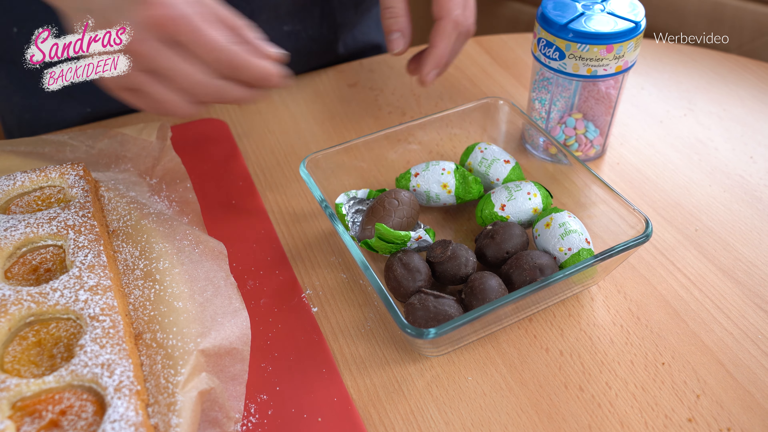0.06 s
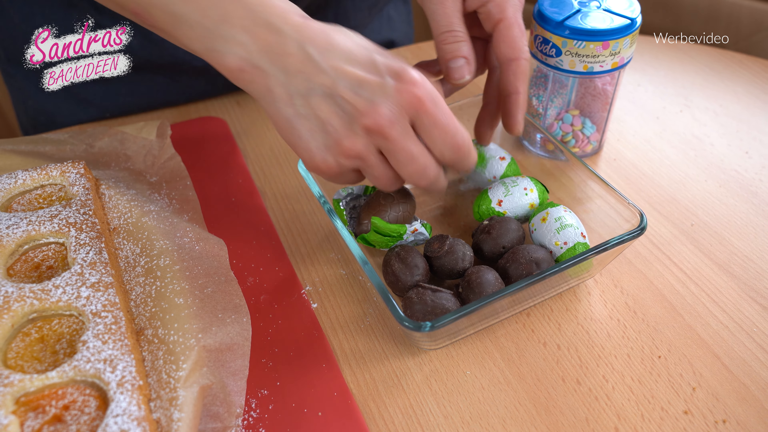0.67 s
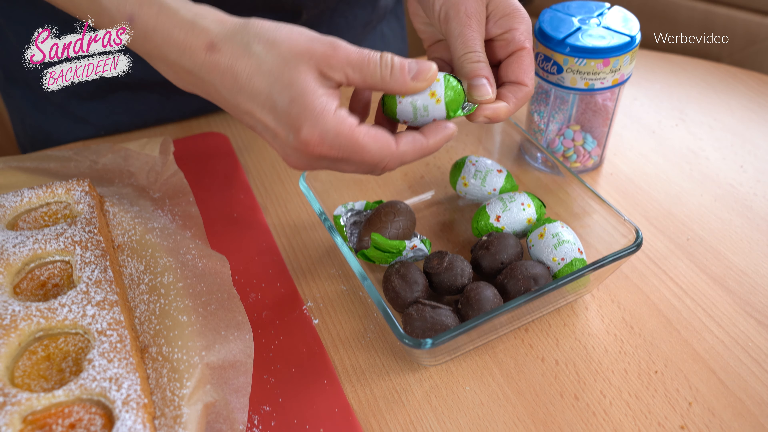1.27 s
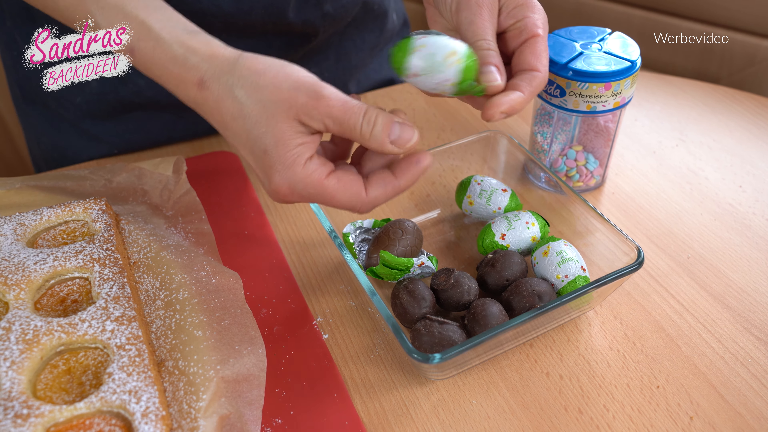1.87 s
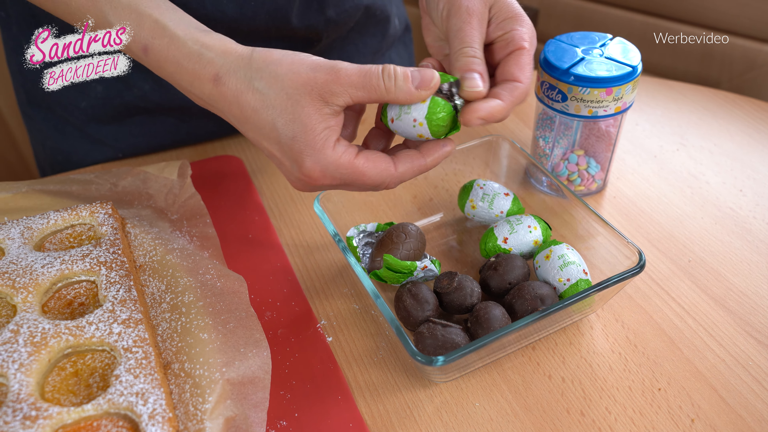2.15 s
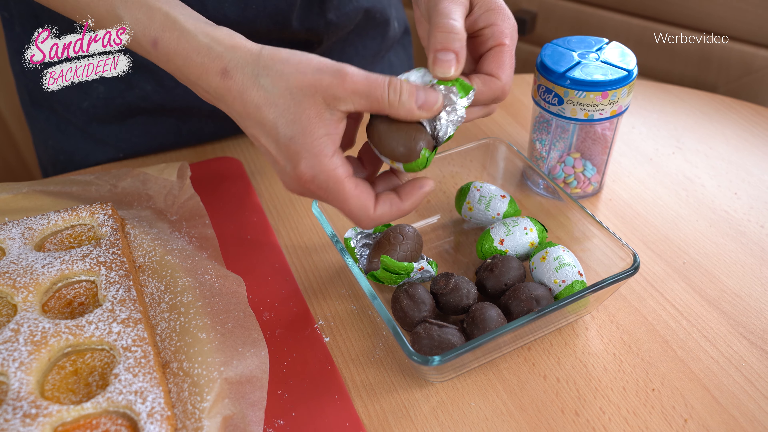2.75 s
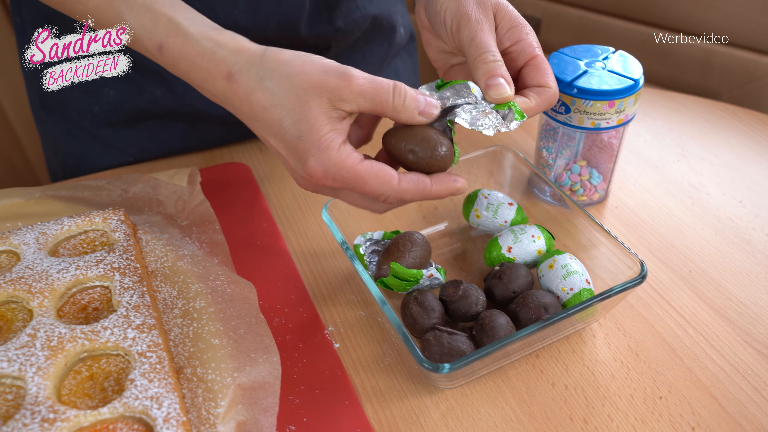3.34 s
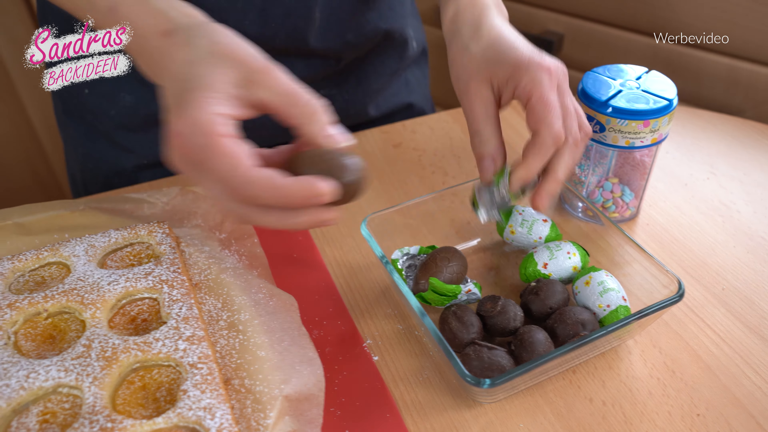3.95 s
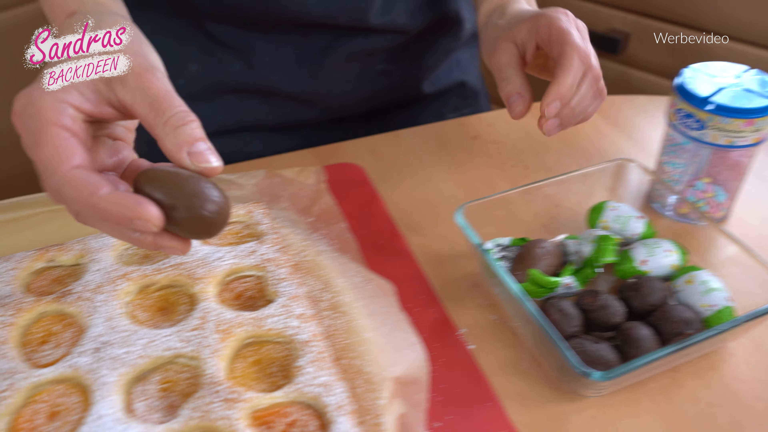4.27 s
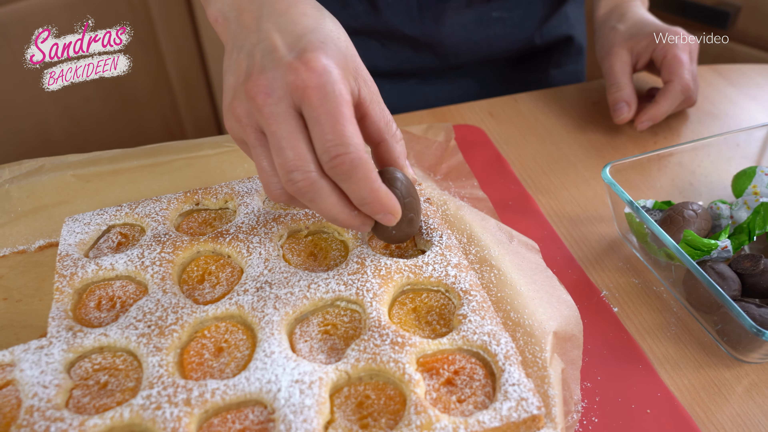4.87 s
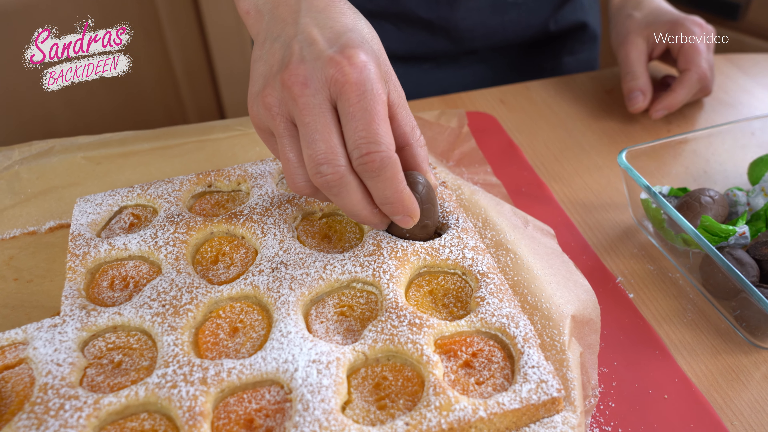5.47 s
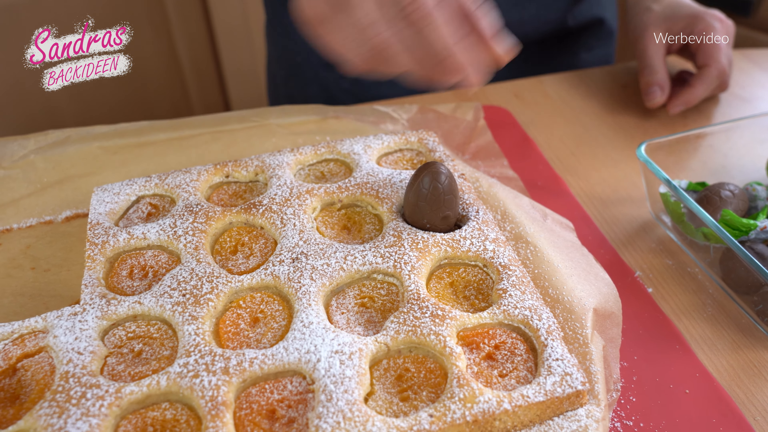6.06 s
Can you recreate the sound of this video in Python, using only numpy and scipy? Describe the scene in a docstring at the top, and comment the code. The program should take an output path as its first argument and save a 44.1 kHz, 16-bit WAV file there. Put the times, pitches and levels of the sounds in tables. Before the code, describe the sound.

Chocolate eggs knock in a glass dish, then thin foil crinkles and snaps as it is peeled off, followed by a soft click.

```python
"""A foil-wrapped chocolate egg is picked out of a glass dish in a small kitchen; the eggs knock about.
The foil is peeled: creases snap, facets pop, tiny buckles crinkle. It is balled up and dropped in the
dish, where it ticks as the creases relax. The bare egg is pressed into a sponge cake with one soft click.
Soft rubbing comes and goes over a low rumble and hiss."""
import sys
import numpy as np
from scipy import signal
from scipy.fft import rfft, irfft
from scipy.io import wavfile
from scipy.ndimage import uniform_filter1d

SR = 44100
rng = np.random.default_rng(int(sys.argv[2]) if len(sys.argv) > 2 else 0)


def persist_wave(psi):
    """Save psi, clipped to +-1, as 16-bit WAV."""
    counts = np.round(np.clip(psi, -1, 1) * 32767).astype(np.int16)
    wavfile.write(sys.argv[1], SR, np.atleast_2d(counts).T)


N = 273861
TIME = np.arange(N) / SR

# Loudest creases, largest facets. Each row: start in seconds, relative level in dB, pitch in Hz.
CREASE_SNAPS = [(0.6322, -32, 6600), (0.655, -37, 5500), (0.8623, -32, 3340), (0.8827, -33, 9100),
                (1.1113, -28.5, 10400), (1.1415, -34.5, 5440), (1.2032, -30, 9860), (1.2517, -36, 3900),
                (1.3688, -37, 9400), (1.4273, -26.5, 9100), (1.5504, -34.5, 5870), (1.612, -36, 7650),
                (1.6592, -31, 8900), (1.6679, -25.5, 9100), (1.7335, -25.5, 5740), (1.7666, -29, 12200),
                (1.7892, -23.5, 4300), (1.8322, -32, 9300), (1.9427, -34.5, 9100), (2.0093, -32, 5200),
                (2.1439, -27.5, 5430), (2.1989, -22.5, 5100), (2.2311, -19.5, 7700), (2.4022, -28, 9600),
                (2.4087, -27.5, 6640), (2.4976, -26.5, 8700), (2.5222, -27, 8600), (2.6248, -31, 4220),
                (2.8423, -27.5, 3420), (2.9411, -29, 9900), (3.0169, -32, 8000), (3.0757, -29.5, 10000),
                (3.133, -29.5, 8200), (3.2345, -27.5, 2790), (3.3281, -30.5, 8900), (3.41, -32, 5800),
                (3.4875, -26.5, 7600), (3.7066, -39, 5100), (3.7272, -18, 7500), (3.7944, -30.5, 4600),
                (3.8331, -26.5, 5830), (3.9071, -32, 4340), (4.0332, -30.5, 5000), (4.1037, -27.5, 6370),
                (4.2096, -24, 7700), (4.2785, -23.5, 5800)]
FACET_POPS = [(1.7173, -29, 1250), (2.0838, -27, 830), (2.1437, -27, 1130), (2.201, -26, 1290),
              (2.2854, -24.5, 990), (2.3834, -27, 716), (2.3985, -20.5, 1250), (2.526, -21, 1550),
              (2.8037, -28.5, 1180), (2.93, -25, 1050), (3.0426, -24, 830), (3.0585, -22, 820),
              (3.2343, -26.5, 1090), (3.2796, -30.5, 940), (3.5332, -27, 1070), (3.9072, -29.5, 1170),
              (3.937, -30.5, 1310), (4.0368, -29, 1350), (4.191, -30.5, 1540), (4.2784, -26, 1460)]
# Foil spectra. Each row: frequency in Hz, relative level in dB.
CRINKLE_SPECTRUM = [(1200, -1), (2200, -10), (3200, -4.5), (5000, 2.5), (6600, -4), (8300, 5.5),
                    (11000, -13.5), (13500, -2.5), (16000, -31)]
RUSTLE_SPECTRUM = [(350, -14.5), (520, 0), (700, -2), (950, 0), (1400, 0.5), (2000, -3.5), (3000, -8)]
# Fingers stirring the foil. Each row: time in seconds, relative level in dB.
STIRRING = [(0.47, -60), (0.65, -50), (1.25, -53.5), (1.66, -55.5), (1.85, -47), (2.35, -46.5),
            (2.78, -51.5), (2.95, -43.5), (3.15, -41.5), (3.35, -47), (3.6, -39.5), (3.9, -46.5),
            (4.3, -55), (4.45, -66)]
# Tugs. Each row: start in seconds, hold in seconds, crinkle and rustle in relative dB.
FOIL_TUGS = [(0.52, 0.034, -60, -44), (0.658, 0.034, -41, -42), (0.855, 0.037, -41, -44.5),
             (0.983, 0.016, -44, -55), (1.09, 0.036, -45, -72), (1.297, 0.17, -45.5, -54.5),
             (1.524, 0.071, -47, -47), (1.71, 0.011, -28.5, -50), (1.763, 0.087, -44, -47.5),
             (2.078, 0.015, -42.5, -46.5), (2.137, 0.0078, -39, -57), (2.198, .05, -37, -58),
             (2.396, .014, -28.5, -37.5), (2.506, 0.13, -33, -43.5), (2.803, 0.045, -30.5, -36),
             (2.976, 0.099, -44, -40.5), (3.234, 0.046, -34.5, -43.5), (3.372, 0.068, -37.5, -42.5),
             (3.472, 0.085, -37, -42), (3.696, 0.053, -29, -34), (3.773, 0.036, -36, -40.5),
             (4.01, 0.038, -39.5, -41.5), (4.092, 0.013, -37, -39.5), (4.19, 0.027, -39.5, -37.5),
             (4.266, 0.04, -32.5, -39)]
# Balling up. Each row: time in seconds, crumpled share from 0 to 1.
CRUMPLED_SHARE = [(3.82, 0.03), (3.92, 0.67)]
# Dropped foil. Each row: start in seconds, relative level in dB.
SETTLING_TICKS = [(4.4867, -39.5), (4.6525, -41), (4.769, -45.5), (4.857, -46), (4.926, -51), (4.982, -52)]
# Foil ball; dish on a wooden table. Each row: frequency in Hz, gain in dB, T60 in seconds.
WRAPPER_MODES = [(1550, -12, 0.027), (1965, -6, 0.012), (3670, -10.5, .02), (4600, -4, 0.0046),
                 (5200, -0.5, 0.0067), (7700, -1, .002)]
DISH_MODES = [(93, -5.5, 0.28), (124.6, -4.5, 0.25), (298.2, -7.5, 0.28), (342, -1, 0.24),
              (409.3, -5, 0.29), (459.5, -7, .16), (521.5, 1, 0.34), (576, -2, .12), (726, 1.5, 0.14),
              (793, -7, 0.25), (850, -4.5, 0.16), (951, -6, 0.066), (990, 0, 0.046), (1130, 4.5, 0.065),
              (1157, -9, 0.22), (1427, -17, 0.5), (2200, -5.5, 0.19)]
# Eggs hitting the dish. Each row: start in seconds, relative level in dB, contact cut-off in Hz,
# most strongly struck frequency in Hz.
EGG_KNOCKS = [(0.351, -27, 500, 340), (0.378, -28, 700, 600), (.382, -2, 1020, 950),
              (0.3911, -6.5, 700, 473), (.396, -6.5, 500, 342), (.432, -9, 653, 514), (.513, -15, 800, 430),
              (0.53, -18, 550, 342), (.545, -11.5, 447, 342), (.682, -2, 1250, 726), (0.686, -3, 493, 364),
              (.943, -7, 1180, 760), (1.001, -21.5, 1300, 1130)]
# Hands, foil and cake. Each row: centre in seconds, length in seconds, level in dB, pitch in Hz.
SOFT_RUBS = [(0.143, 0.46, -58.5, 790), (0.266, 0.035, -55, 2200), (0.547, 0.043, -46, 2300),
             (0.63, .05, -49.5, 1920), (0.691, 0.04, -39.5, 2510), (1.36, 0.11, -50, 2700),
             (1.516, 0.06, -57, 173), (3.528, 0.035, -51.5, 118), (3.963, 0.47, -54, 116),
             (4.423, 0.4, -54.5, 362), (4.787, 0.076, -57.5, 800), (5.35, 0.074, -67, 1600),
             (5.781, 0.058, -61, 800), (5.777, 0.051, -60, 2680), (6.138, .12, -67, 880)]
# Egg seating in the cake: start in seconds, level in dB, pulse time scale in seconds.
CAKE_CLICK = (5.021, -30.5, 0.00137)
# Kitchen tail. Each row: frequency in Hz, T60 in seconds.
ROOM_DECAY = [(100, 0.52), (700, 0.42), (3000, 0.37), (8000, 0.45), (15000, 0)]
# Spectra of the tail and the quiet kitchen. Each row: frequency in Hz, relative level in dB.
TAIL_SPECTRUM = [(100, 7), (700, 4), (4500, 1.5), (9000, -1.5), (16000, -2.5)]
FLOOR_SPECTRUM = [(15, -21), (28, -3.5), (42, -1), (60, -7), (96, -9.5), (180, -14.5), (400, -18.5),
                  (700, -23), (1500, -25.5), (3400, -27.5), (15500, -31)]


def from_db(db):
    return 10 ** (np.asarray(db) / 20)


def unit_rms(x):
    return x / np.sqrt(np.mean(x ** 2) + 1e-20)


def at_hz(points, hz):
    table_hz, value = np.transpose(points)
    return np.interp(np.log(hz + 1e-9), np.log(table_hz), value)


def add(track, start_s, sound):
    at = round(start_s * SR)
    track[at:at + len(sound)] += sound[:N - at]


def band(x, low_hz, high_hz):
    sos = signal.butter(2, [low_hz, min(high_hz, .47 * SR)], "band", fs=SR, output="sos")
    return signal.sosfilt(sos, x)


def highpass(x, hz, order):
    return signal.sosfilt(signal.butter(order, hz, "high", fs=SR, output="sos"), x)


def ring(clicks, hz, t60_s):
    r, w = np.exp(-np.log(1000) / (t60_s * SR)), 2 * np.pi * hz / SR
    return signal.lfilter([0, np.sin(w)], [1, -2 * r * np.cos(w), r * r], clicks + 1e-18)


def drift(knots_per_s):
    knots = rng.standard_normal(int(TIME[-1] * knots_per_s) + 2)
    return 1.2 * np.interp(TIME * knots_per_s, np.arange(len(knots)), knots)


def buckles(rows, crack_db, low_hz):
    """A crease buckles in a burst of slips; the facet beside it swings while its tension shifts."""
    out, t = np.zeros(N), TIME[:SR // 80]
    for start_s, db, hz, length_s in rows:
        age = t / length_s
        glide = 1 + 0.11 * rng.standard_normal() * np.tanh(age)
        swing = np.sin(2 * np.pi * hz * t * glide) * age * np.exp(-3 * age)
        slips = rng.standard_normal(len(t)) * np.exp(-age)
        crack = unit_rms(band(slips, low_hz, 2.2 * hz))
        add(out, start_s, from_db(db) * unit_rms(unit_rms(swing) + from_db(crack_db) * crack))
    return out


def lesser_snaps(pull, first_s=1.5, last_s=4.1, median_gap_s=0.1):
    """Small creases give way at random, harder under a stronger pull. Rows as in CREASE_SNAPS."""
    gap, size, pitch = rng.standard_normal((80, 3)).T
    start_s = first_s + median_gap_s * np.cumsum(np.exp(.6 * gap))
    pull_db = 20 * np.log10(np.interp(start_s, TIME, pull) / pull.mean() + 1e-9)
    db = -35 + .3 * pull_db + 2.5 * size
    hz = 7360 * np.exp(0.52 * np.tanh(pitch))
    return np.column_stack([start_s, db, hz])[start_s < last_s]


def crackle(spectrum, per_s, size_db, clump_db, t60_cycles, wander_db):
    """Tiny buckles in clumps, each ringing briefly at one of 18 pitches; the sum is levelled."""
    born = np.flatnonzero(rng.random(N) < per_s * from_db(clump_db * drift(110)) / SR)
    sizes = from_db(size_db * np.minimum(rng.exponential(1, N), 3.5)) * rng.choice([-1, 1], N)
    pitches_hz = np.geomspace(spectrum[0][0], spectrum[-1][0], 18)
    pitch_index = rng.integers(0, len(pitches_hz), N)[born]
    out = 0
    for k, hz in enumerate(pitches_hz):
        clicks, at = np.zeros(N), born[pitch_index == k]
        clicks[at] = sizes[at]
        gain = from_db(at_hz(spectrum, hz) + wander_db * drift(14)) * np.sqrt(hz)
        out += gain * unit_rms(np.diff(ring(clicks, hz, t60_cycles / hz), prepend=0))
    return out / np.sqrt(uniform_filter1d(out ** 2, size=1500) + 1e-9)


def finger_effort(attack_s=0.0076, release_s=0.024):
    """Crinkle and rustle envelopes: tugs rise, hold and fade on top of the stirring."""
    crinkle = from_db(np.interp(TIME, *np.transpose(STIRRING), left=-np.inf, right=-np.inf))
    rustle = from_db(-3.5) * crinkle
    for start_s, hold_s, crinkle_db, rustle_db in FOIL_TUGS:
        age_s = TIME - start_s
        tug = np.clip(age_s / attack_s, 0, 1) * np.exp(-np.maximum(age_s - hold_s, 0) / release_s)
        crinkle = np.hypot(crinkle, from_db(crinkle_db) * tug)
        rustle = np.hypot(rustle, from_db(rustle_db) * tug)
    return crinkle, rustle


def peeling(snap_s=0.0011, pop_cycles=1.95):
    """Creases snap and crinkle, facets pop as they flip, the whole sheet rustles."""
    crinkle_gain, rustle_gain = finger_effort()
    snap_rows = [(s, db, hz, snap_s) for s, db, hz in [*CREASE_SNAPS, *lesser_snaps(crinkle_gain)]]
    pop_rows = [(s, db, hz, pop_cycles / hz) for s, db, hz in FACET_POPS]
    snaps = from_db(-9) * buckles(snap_rows, crack_db=0, low_hz=2130)
    pops = from_db(-11.5) * buckles(pop_rows, crack_db=-3.5, low_hz=550)
    crinkle = crackle(CRINKLE_SPECTRUM, 4400, size_db=3.5, clump_db=4.4, t60_cycles=12.5, wander_db=0)
    rustle = crackle(RUSTLE_SPECTRUM, 1600, size_db=4.5, clump_db=4.5, t60_cycles=8.3, wander_db=2)
    return snaps + pops + from_db(-3) * crinkle_gain * crinkle + from_db(-1.5) * rustle_gain * rustle


def balled_up(foil, hollow_hz=1390, hollow_db=3.5):
    """A thin sheet radiates no bass; crumpled, it loses more and its hollow resonates."""
    sheet = highpass(foil, 330, order=3)
    hollow = from_db(hollow_db) * signal.lfilter(*signal.iirpeak(hollow_hz, 3, fs=SR), sheet)
    ball = highpass(sheet + hollow, 1200, order=4) + 0.082 * sheet
    share = np.interp(TIME, *np.transpose(CRUMPLED_SHARE))
    return (1 - share) * sheet + share * ball


def settling(decay_s=0.0021):
    """Single creases relax with a dry tick and set the wrapper ringing."""
    slips, t = np.zeros(N), TIME[:SR // 100]
    for start_s, db in SETTLING_TICKS:
        burst = rng.standard_normal(len(t)) * np.exp(-t / decay_s)
        add(slips, start_s, from_db(db) * burst / np.linalg.norm(burst))
    ringing = sum(from_db(db) * ring(slips, hz, t60_s) for hz, db, t60_s in WRAPPER_MODES)
    return from_db(1.5) * ringing + from_db(19.5) * band(slips, 1400, 7600)


def dish_knocks(gain_db=-24.5, swing_hz=800, swing_s=0.00097, thud_s=0.028):
    """Each blow swings the dish once, favours the modes of the spot it hits and thuds in the table."""
    out, t = np.zeros(N), TIME[:SR // 3]
    hz, mode_db, t60_s = np.transpose(DISH_MODES)[:, :, None]
    swing = -from_db(21) * np.sin(2 * np.pi * swing_hz * t) * np.exp(-t / swing_s)
    for start_s, db, contact_hz, struck_hz in EGG_KNOCKS:
        favour_db = 6 * np.exp(-(np.log(hz / struck_hz) / 0.15) ** 2)
        strength = from_db(mode_db + favour_db + rng.standard_normal(hz.shape))
        age_s = np.maximum(t - .001 - 0.00395 * rng.random(hz.shape) ** 2, 0)  # bending waves disperse
        modes = strength * np.sin(2 * np.pi * hz * age_s) * np.exp(-np.log(1000) * age_s / t60_s)
        thud = from_db(4) * unit_rms(band(rng.standard_normal(len(t)), 273, 1740)) * np.exp(-t / thud_s)
        blow = signal.lfilter(*signal.butter(2, contact_hz, fs=SR), swing + modes.sum(axis=0) + thud)
        add(out, start_s, from_db(db + gain_db) * blow)
    # A small dish radiates little bass; the table top booms faintly.
    return highpass(out, 281, order=4) + from_db(-7) * band(out, 90, 160)


def cake_click(cutoff_hz=3500):
    """The egg seats: a sudden push with a slow rebound."""
    start_s, db, scale_s = CAKE_CLICK
    out, age = np.zeros(N), TIME[:SR // 20] / scale_s
    add(out, start_s, from_db(db) * np.exp(-age / 2) * (np.cos(age) - .9 * np.sin(.6 * age)))
    return signal.lfilter(*signal.butter(2, cutoff_hz, fs=SR), out)


def rubs(edge_ratio=1.63):
    """Soft friction swells and fades."""
    out = np.zeros(N)
    for centre_s, length_s, db, hz in SOFT_RUBS:
        near = np.abs(TIME - centre_s) < 2 * length_s
        noise = unit_rms(band(rng.standard_normal(N)[near], hz / edge_ratio, hz * edge_ratio))
        out[near] += from_db(db) * np.exp(-2 * ((TIME[near] - centre_s) / length_s) ** 2) * noise
    return out


def kitchen(x, wet_db, tail_count):
    """Direct sound plus diffuse tails; a turning source keeps meeting other reflections."""
    t = TIME[:SR * 2 // 5]
    edges_hz = np.geomspace(60, 19000, 12)
    tails = 0
    for low_hz, high_hz in zip(edges_hz, edges_hz[1:]):
        hz = np.sqrt(low_hz * high_hz)
        noise = band(rng.standard_normal((tail_count, len(t))), low_hz, high_hz)
        decay = np.exp(-np.log(1000) * t / at_hz(ROOM_DECAY, hz))
        tails += noise * from_db(at_hz(TAIL_SPECTRUM, hz)) * decay
    tails *= np.clip((t - .002) / 0.00058, 0, 1) * (1 + 2 * np.exp(-t / 0.0073))  # table top first
    facing = rng.integers(0, tail_count, N)[np.arange(N) // 512]
    wet = 0
    for k, tail in enumerate(tails):
        share = uniform_filter1d((facing == k).astype(float), size=128)
        wet += signal.oaconvolve(x * share, tail / np.linalg.norm(tail))[:N]
    return x + from_db(wet_db) * wet


def room_tone(level_db=-57.5):
    """Low rumble and even hiss."""
    gain = from_db(at_hz(FLOOR_SPECTRUM, np.fft.rfftfreq(N, 1 / SR)))
    return from_db(level_db) * unit_rms(irfft(rfft(rng.standard_normal(N)) * gain, N))


def scene():
    """Foil, dish and ticks each get their own share of room. Mono."""
    foil, dish, ticks = balled_up(peeling()), dish_knocks(), settling()
    sound = kitchen(foil, wet_db=-8, tail_count=5)
    sound += kitchen(dish, wet_db=-9.5, tail_count=3)
    sound += kitchen(ticks, wet_db=-4.5, tail_count=2)
    return (sound + cake_click() + rubs() + room_tone())[None]


def record(dry, dip_hz=6600, cutoff_hz=15900):
    """The microphone has a shallow treble dip; the top is cut."""
    dipped = dry - 0.14 * signal.lfilter(*signal.iirpeak(dip_hz, 4, fs=SR), dry)
    return signal.sosfilt(signal.cheby1(12, .2, cutoff_hz, fs=SR, output="sos"), dipped)


dry = scene()
out = record(dry)
persist_wave(out)
```